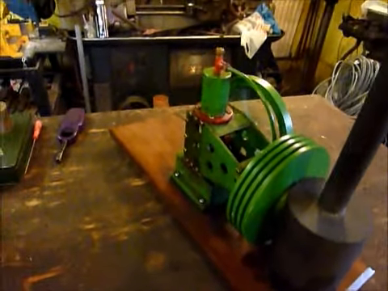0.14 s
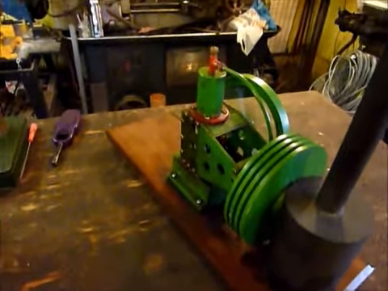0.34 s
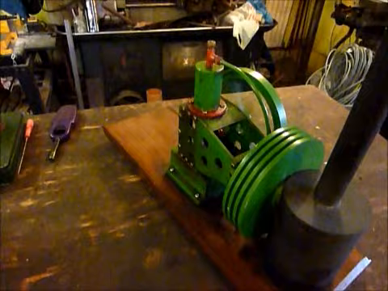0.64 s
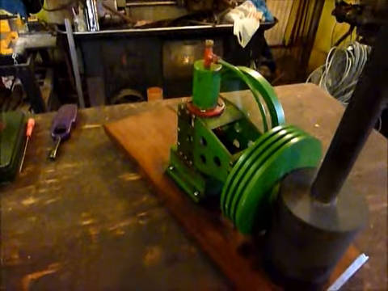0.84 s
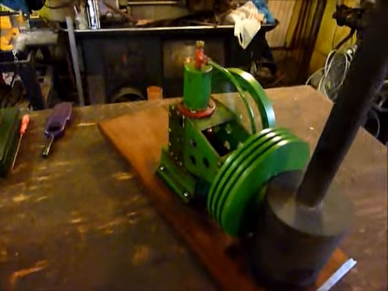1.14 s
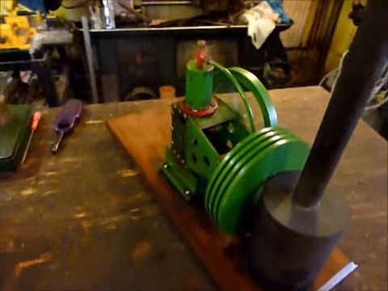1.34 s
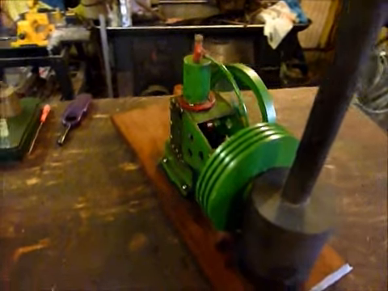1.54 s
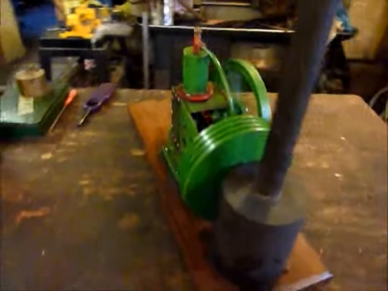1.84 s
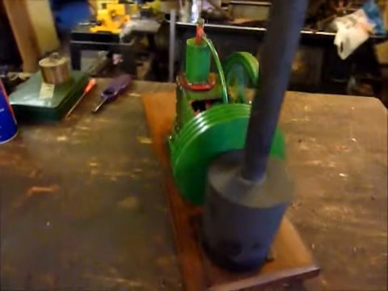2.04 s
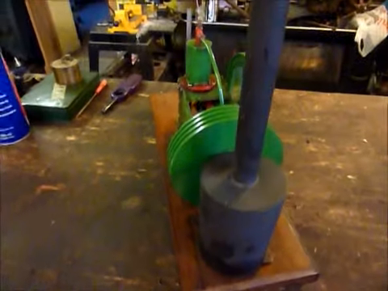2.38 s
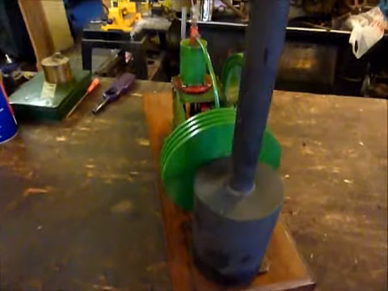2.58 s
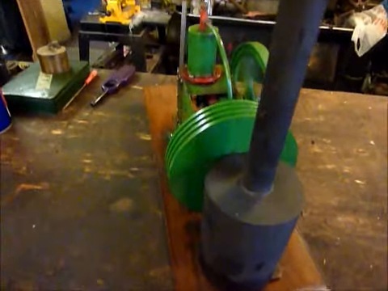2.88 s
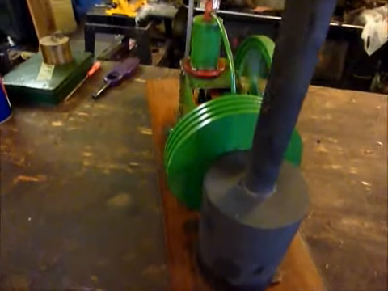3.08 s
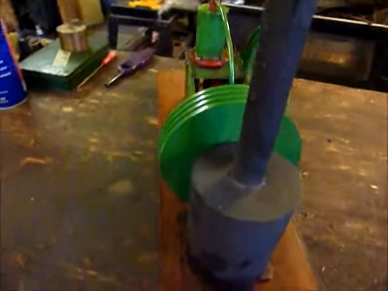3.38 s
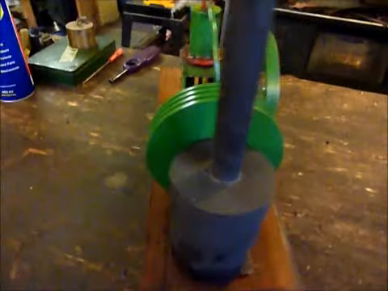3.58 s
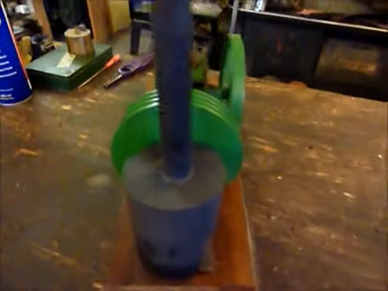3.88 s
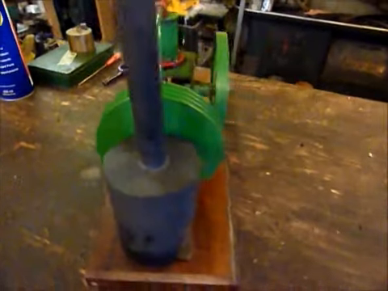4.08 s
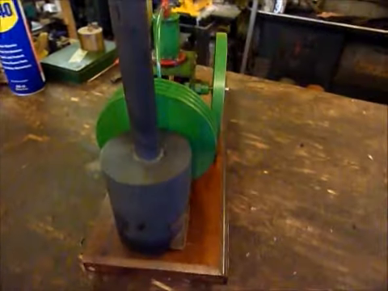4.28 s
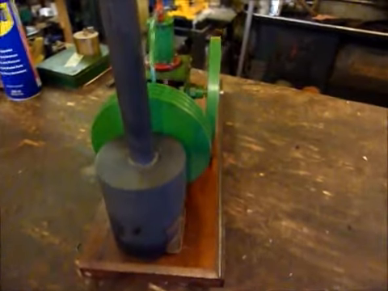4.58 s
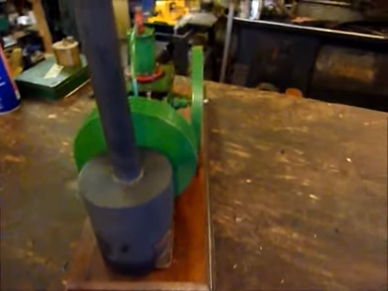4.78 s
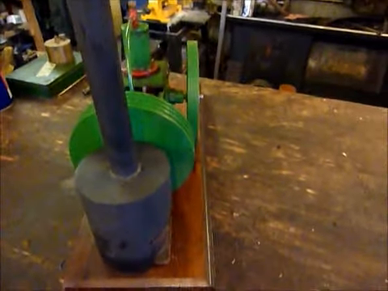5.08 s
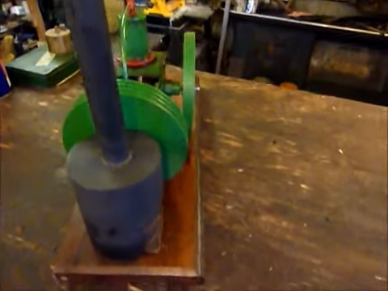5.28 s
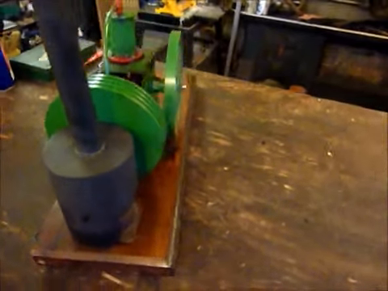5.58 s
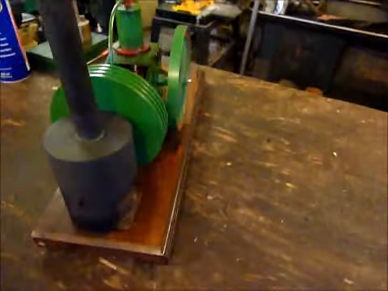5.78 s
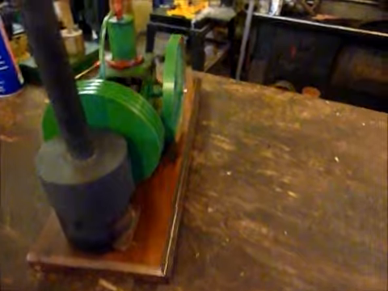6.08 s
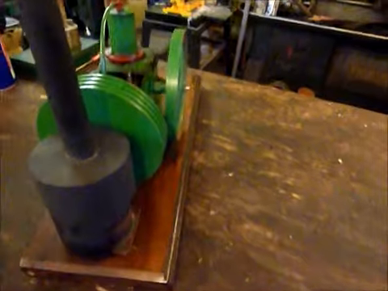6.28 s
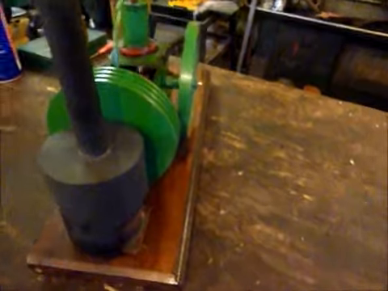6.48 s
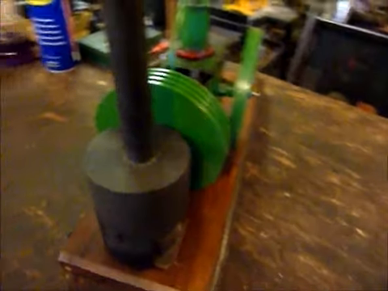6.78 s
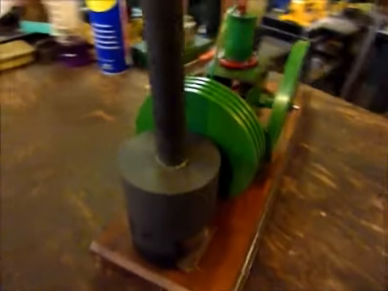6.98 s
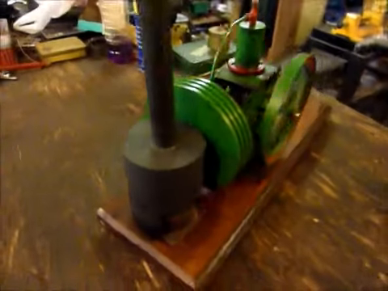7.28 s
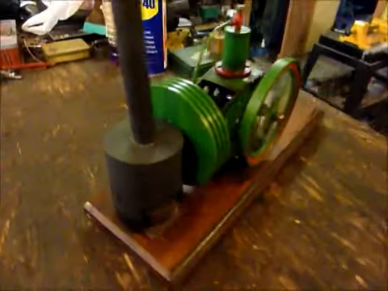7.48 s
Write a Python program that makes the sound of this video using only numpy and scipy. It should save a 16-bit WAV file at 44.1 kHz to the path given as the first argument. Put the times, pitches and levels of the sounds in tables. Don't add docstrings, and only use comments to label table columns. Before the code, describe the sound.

Close to a small camera microphone in a hard-walled workshop, a little engine ticks over steadily, its slack joints alternating low knock and bright rattly clack above a faint burner rush. Shoes thud and scuff around it. Isolated brittle snaps of grit jump well above the engine between 3 and 6 s, then mostly engine remains until a last soft step near the end.

```python
import sys
import numpy as np
from scipy import signal
from scipy.fft import rfft, irfft
from scipy.io import wavfile
from scipy.ndimage import uniform_filter1d

SR = 44100
rng = np.random.default_rng(int(sys.argv[2]) if len(sys.argv) > 2 else 0)


def boost(x):
    u = np.asarray(x, float) / 20
    return 10 ** u


def file_out(sig):
    cols = np.atleast_2d(sig).T
    lim = np.clip(cols, -1, 1)
    pcm = np.round(lim * 32767).astype(np.int16)
    wavfile.write(sys.argv[1], SR, pcm)


N = 336924


def band(x, lo_hz, hi_hz, order=2):
    return signal.sosfilt(signal.butter(order, [lo_hz, hi_hz], "band", fs=SR, output="sos"), x)


def unit(x):
    return x / np.sqrt(np.mean(x ** 2))


def noise():
    return rng.standard_normal(N)


def ring(x, hz, t60):
    pole = np.exp(2j * np.pi * hz / SR - np.log(1000) / (t60 * SR))
    return signal.lfilter([1], [1, -pole], x).imag


def contacts(count, last_s, rise_s):
    t = np.arange(900) / SR
    envelope = (1 - np.exp(-t / rise_s)) * np.exp(-t / last_s)
    force = rng.standard_normal((count, len(t))) * envelope
    return force / np.sqrt(np.sum(force ** 2, axis=1, keepdims=True))


def place(s, rows):
    out = np.zeros(N + rows.shape[1])
    start = (np.asarray(s)[:, None] * SR).astype(int)
    np.add.at(out, start + np.arange(rows.shape[1]), rows)
    return out[:N]


def walk(rate_hz):
    k = int(SR / rate_hz)
    steps = np.repeat(rng.standard_normal(N // k + 1), k)
    return unit(uniform_filter1d(uniform_filter1d(steps, k), k)[:N])


# f/Hz, level/dB per Hz
SHOP_AIR = [(18, -47), (30, -11.5), (333, -4), (570, 1.5), (829, -3.5), (910, -2), (1200, -3), (2260, -8.5),
            (2610, -12), (3070, -10), (6950, -22), (8000, -37.5), (10400, -55), (17600, -120)]
# f/Hz, width/Hz, level/dB
CHIMNEY_MODES = [(118.6, 20, -67.5), (164.8, 5.9, -68.5), (216, 25, -67), (268, 8.6, -65.5),
                 (331, 12, -61.5), (586.4, 39, -65.5)]


def burner():
    hz, db = np.transpose(SHOP_AIR)
    f = np.fft.rfftfreq(N, 1 / SR) + 1
    colour = boost(np.interp(np.log(f), np.log(hz), db))
    air = unit(irfft(rfft(noise()) * colour, N))
    pipe = np.zeros(N)
    for centre, width, level in CHIMNEY_MODES:
        pipe += boost(level) * unit(band(noise(), centre - width / 2, centre + width / 2, order=1))
    breath_db = 1.4 * walk(3.8)
    return boost(-56 + breath_db) * air + pipe


# low f/Hz, high f/Hz, t60/s, level/dB
WALLS = [(147, 740, 0.61, -16.5), (670, 1780, 0.36, -17), (1460, 3300, 0.29, -17), (2830, 6400, 0.5, -18),
         (5300, 9000, 0.24, -4)]


def room(x):
    t = np.arange(SR // 2) / SR
    shape = np.clip((t - 0.002) / 0.0093, 0, 1)
    for echo_s, db in [(0.0055, 6), (0.017, 1.2), (0.0225, 6)]:
        shape = shape + boost(db) * np.exp(-((t - echo_s) / 0.0011) ** 2)
    tail = np.zeros(len(t))
    for lo, hi, t60, db in WALLS:
        tail += boost(db - 26 - 60 * t / t60) * band(rng.standard_normal(len(t)), lo, hi)
    return signal.fftconvolve(x, tail * shape)[:N]


# t/s, level/dB
SCUFF_LEVEL = [(0.0, -85), (0.57, -71), (0.91, -75.5), (2.0, -71.5), (2.23, -63), (2.59, -71.5),
               (3.04, -67), (3.15, -55.5), (3.3, -71.5), (3.55, -72), (3.62, -77), (3.76, -55), (3.81, -59),
               (3.87, -56.5), (4.04, -66), (4.11, -71.5), (4.4, -71.5), (4.89, -67), (5.19, -72.5),
               (5.45, -62), (5.6, -73), (5.7, -58), (5.98, -73), (6.38, -66), (6.53, -75), (7.64, -73.5)]


def scuffs():
    s, db = np.transpose(SCUFF_LEVEL)
    hiss = unit(band(noise(), 5500, 7700)) + boost(-2) * unit(band(noise(), 1500, 5300))
    flutter_db = 3.6 * walk(30)
    return hiss * boost(np.interp(np.arange(N) / SR, s, db) + flutter_db)


# t/s, level/dB, f/Hz, t60/s
FOOTFALLS = [(0.643, -34, 400, 0.14), (.67, -41.5, 242, 0.16), (1.588, -19, 620, 0.043),
             (3.14, -50, 217, 0.19), (3.12, -43, 600, 0.39), (3.158, -44, 455, .15), (3.85, -57, 75, 0.67),
             (4.1, -57, 72, 0.71), (4.66, -32.5, 460, 0.11), (4.86, -44, 217, 0.25), (5.05, -45, 232, 0.75),
             (5.434, -34, 470, 0.08), (5.6, -38, 316, 0.076), (7.489, -48, 255, 0.085),
             (7.505, -36, 206, .15)]


def thuds():
    out = np.zeros(N)
    t = np.arange(SR // 2) / SR
    for s, db, hz, t60 in FOOTFALLS:
        push = rng.standard_normal(len(t)) * (t / 0.0046).clip(0, 1) * boost(-60 * t / t60)
        boards = band(push, hz / 1.445, hz * 1.4) * np.sqrt(400 / hz)
        out += place([s], boost(db + 15) * boards[None])
    return out


# t/s, peak level/dB, ring f/Hz, then ring, body and edge level/dB under the peak
GRIT_CRACKS = [(0.3007, -46, 2220, -10, 5, -20), (1.5883, -22.5, 1860, -7.5, -13, -31),
               (2.303, -44, 1500, 5, 3, -3.5), (2.312, -33, 1410, -12, -1, -25),
               (2.617, -40, 2360, 3.5, -2, -19), (2.6258, -37, 2000, -7, 4, -29),
               (2.9448, -36, 1390, -10, -15, -11.5), (3.0084, -10, 3504, -5.5, -15, -38),
               (3.5516, -48.5, 3600, 7, 4, 2), (3.5777, -5, 3676, -6, -18.5, -52),
               (3.7319, -31, 7450, 3.5, 4, 8), (3.7354, -15.5, 6500, -1.5, -12, -19),
               (3.7449, -27, 7070, 2, -13, -5.5), (3.8594, -13.5, 6460, -12.5, -17, -14),
               (3.8656, -18.5, 6770, -11, -11, -12.5), (3.8779, -23.5, 6040, -3, -4.5, -10),
               (3.9933, -21.5, 4000, -9, -2.5, -33.5), (4.2764, -39, 2150, -11, 8, 3.5),
               (4.2839, -26.5, 1870, -7, -11, -15), (4.2906, -26, 2040, -6, 5, -20),
               (4.394, -45, 2200, -4, -4, -4.5), (4.4112, -56, 1710, -4, 11, 0),
               (4.6575, -6, 2064, -7, -24, -12), (4.897, -56, 1540, -7, 11, 5),
               (5.3602, -10, 3430, 1, -14, -7), (5.6246, -30.5, 1700, -4.5, -10, -18.5),
               (5.6325, -25.5, 1680, -14, -10, -30), (5.6754, -30.5, 3410, -5, 6.5, -25),
               (5.7344, -23.5, 1880, -10.5, -7, -9), (5.7391, -10.5, 2040, -6.5, -35, -19),
               (6.1881, -26, 3470, -4.5, -11, -41), (7.4882, -30.5, 1410, -10, -8, -24)]


def grit():
    s, peak, hz, ring_db, body_db, edge_db = np.transpose(GRIT_CRACKS)
    snap = contacts(len(s), last_s=0.0023, rise_s=0.00011)

    def sized(rows, db):
        return rows / np.abs(rows).max(axis=1, keepdims=True) * boost(peak + db)[:, None]

    middle = sized(band(snap, 3560, 4800), -6.5)
    body = sized(band(snap, 1120, 3640), body_db + 3)
    edge = sized(band(snap, 5010, 6900), edge_db + 4)
    grains = np.array([ring(row, f, 0.025) for row, f in zip(snap, hz)])
    rings = sized(band(grains, 1000, 8000), ring_db - 4)
    return place(s, middle + body + edge + rings)


# f/Hz, t60/s, level under the knock/dB, level under the clack/dB
BOARD_MODES = [(214, 0.065, -16, -18.5), (333, 0.29, -14, -14), (427, .05, -5.5, -3),
               (514, 0.073, -4, -5.5), (579, 0.076, -0.5, -3.5), (691, 0.051, -7.5, -13.5),
               (734, 0.045, -7.5, -5), (928, 0.074, 0, 1), (1018, 0.044, -3, -3.5), (1088, 0.037, -1, -5)]
FRAME_MODES = [(1290, 0.021, -13.5, -8), (1411.4, 0.041, -9, -3.5), (1465, 0.029, 0, -8.5),
               (1620, 0.022, -3, -2), (1707, 0.027, -5, -5.5), (1864, .03, -5.5, -8),
               (2040, 0.028, -3.5, -4.5), (2280, 0.015, 2.5, -2)]
METAL_MODES = [(2880, 0.071, -2.5, -24.5), (3027, 0.066, 1, -3.5), (3320, 0.037, -20.5, -5.5),
               (3430, 0.066, -8.5, -7), (3600, 0.035, -18.5, -6), (3798, 0.062, -20.5, -5.5),
               (3940, 0.029, -13, -8), (4280, 0.016, -27, -12), (4627, 0.038, -13.5, -9.5),
               (4832, 0.029, -18, -8)]
# low f/Hz, high f/Hz
RADIATED = [(170, 1400), (1100, 2600), (2800, 5100)]


def blows(table, column, bounce_s, bounce_db, part_db, scatter_db):
    s, blow, hard, metal = np.transpose(table)
    force = boost(bounce_db) * contacts(len(s), bounce_s, rise_s=0.0007)
    force[:, 0] = 1
    levels = (blow + part_db[0], blow + hard + part_db[1], blow + metal + part_db[2])
    out = np.zeros(N)
    for modes, edges, db in zip((BOARD_MODES, FRAME_MODES, METAL_MODES), RADIATED, levels):
        part = np.zeros(N)
        for k, mode in enumerate(modes):
            chance_db = scatter_db * rng.standard_normal(len(s))
            size = (-1) ** k * boost(db + mode[column] + chance_db)
            part += ring(place(s, force * size[:, None]), mode[0], mode[1])
        out += band(part, *edges)
    return out


# t/s, blow level/dB, hardness/dB, metal ring level/dB
LINKAGE_CLACKS = [(0.141, -40, 2.5, -11), (0.312, -41.5, 6, -12), (0.479, -38.5, 2.5, 2),
                  (0.644, -39.5, 0.5, -6.5), (0.815, -41, -1.5, -18), (0.982, -41.5, 0, -19),
                  (1.148, -39, 5, -0.5), (1.317, -36, 2.5, -0.5), (1.485, -42.5, 0, -10),
                  (1.651, -35, -3, -8), (1.82, -39.5, -0.5, 0.5), (1.987, -36, -1, -1),
                  (2.155, -46, 7, -3.5), (2.322, -41.5, 5.5, -1.5), (2.49, -46.5, 6.5, -11),
                  (2.654, -45, -2.5, -1.5), (2.821, -40, -2, 1), (2.988, -49.5, 15, 10.5),
                  (3.159, -44.5, 10.5, -1.5), (3.327, -44, 6.5, -7), (3.492, -39, 5.5, -3.5),
                  (3.66, -41.5, 8.5, 6.5), (3.827, -39.5, 2.5, -2.5), (3.992, -47.5, 1, 11),
                  (4.16, -42.5, 2, -14), (4.329, -39.5, 7.5, 3), (4.496, -45.5, 12.5, 12.5),
                  (4.664, -42.5, 14.5, 10), (4.83, -46.5, 5, 0.5), (4.997, -44, 3.5, 2),
                  (5.162, -40, 1, -0.5), (5.33, -56, 27, 20), (5.496, -40, 5.5, -1), (5.664, -40, 3, 0.5),
                  (5.83, -44.5, 9.5, -15), (5.995, -42, 4.5, -10.5), (6.165, -38, -10, 0.5),
                  (6.326, -47, 9, 10), (6.498, -51, 11.5, -4.5), (6.666, -39.5, 6.5, -12),
                  (6.829, -38.5, 4.5, 4), (6.996, -36, -0.5, -9.5), (7.165, -37, 0.5, -1),
                  (7.334, -45.5, -1, -11.5), (7.494, -40.5, -1, -5)]


def clacks():
    return blows(LINKAGE_CLACKS, column=3, bounce_s=0.0032, bounce_db=-4, part_db=(-5, 0, 0), scatter_db=2.5)


# t/s, blow level/dB, hardness/dB, metal ring level/dB
BIG_END_KNOCKS = [(0.072, -37.5, -8, -29), (0.239, -37, -10, -26), (0.406, -33.5, -5, -26),
                  (0.574, -33, -6.5, -29), (0.742, -32.5, -2, -22), (0.909, -36, -3.5, -36),
                  (1.077, -37, -12, -31), (1.245, -36, -2.5, -34.5), (1.412, -34.5, -6, -20.5),
                  (1.58, -37, 1.5, -4), (1.748, -33.5, -3.5, -21), (1.917, -37.5, -16, -25),
                  (2.081, -39.5, -7, -11), (2.252, -34, -13, -22.5), (2.417, -34, -5.5, -12.5),
                  (2.585, -32.5, -5.5, -19), (2.751, -32, -8, -16), (2.918, -37, -10, -24),
                  (3.087, -39.5, -12, -18), (3.254, -38, -10, -19), (3.42, -35.5, -10, -25.5),
                  (3.589, -33.5, -6, -15.5), (3.755, -34.5, -1, -7), (3.923, -32, -7, -17),
                  (4.09, -32, -2.5, -19.5), (4.257, -41, -12, -6.5), (4.423, -40.5, -4, -20),
                  (4.589, -36, -10, -26.5), (4.757, -35, -1.5, -17), (4.925, -31, -7, -18.5),
                  (5.09, -32.5, -3, -17), (5.258, -34, -3, -15), (5.424, -37.5, -4.5, -11),
                  (5.592, -42, -1.5, -19), (5.758, -36, -1, -4), (5.927, -36.5, -3, -19),
                  (6.094, -33, -4, -19), (6.26, -33.5, -4, -23), (6.426, -32.5, -6, -26),
                  (6.591, -39.5, -18, -17), (6.758, -37, -2.5, -16), (6.926, -33.5, -8.5, -33),
                  (7.091, -33, -3, -16), (7.259, -31.5, -6.5, -23), (7.427, -33.5, -1, -29),
                  (7.594, -39.5, -6, -24)]


def knocks():
    return blows(BIG_END_KNOCKS, column=2, bounce_s=0.002, bounce_db=-10, part_db=(-6, 2, 3), scatter_db=3.0)


def scene():
    engine = knocks() + clacks()
    cracks = grit()
    walls = room(boost(5) * engine + cracks)
    return (engine + cracks + walls + thuds() + scuffs() + burner())[None]


def low_pass(x):
    return signal.sosfilt(signal.butter(12, 8530, fs=SR, output="sos"), x)


def record(dry):
    x = signal.sosfilt(signal.ellip(8, 0.3, 75, 7600, fs=SR, output="sos"), dry)
    top = signal.ellip(5, 0.5, 70, [7760, 8020], "band", fs=SR, output="sos")
    x = x + boost(-9) * signal.sosfilt(top, dry)
    for hz, q in [(5400, 30), (5400, 60), (7710, 70)]:
        x = signal.lfilter(*signal.iirnotch(hz, q, SR), x)
    x = signal.sosfilt(signal.butter(1, 60, "high", fs=SR, output="sos"), x)
    x = x + boost(-98) * rng.standard_normal(x.shape)
    return low_pass(x)


dry = scene()
out = record(dry)
file_out(out)
```